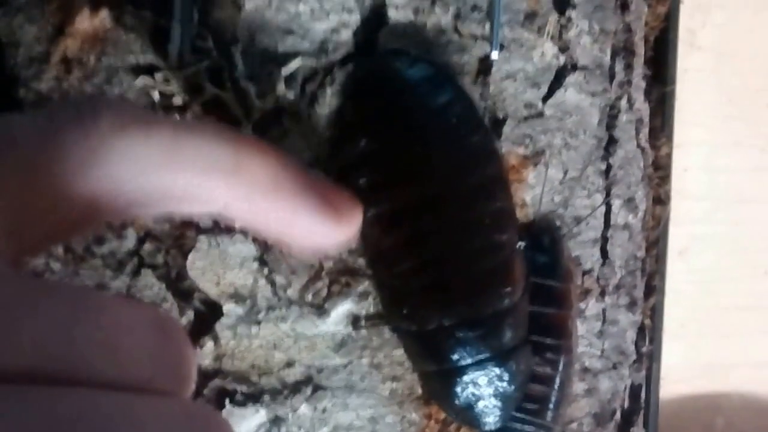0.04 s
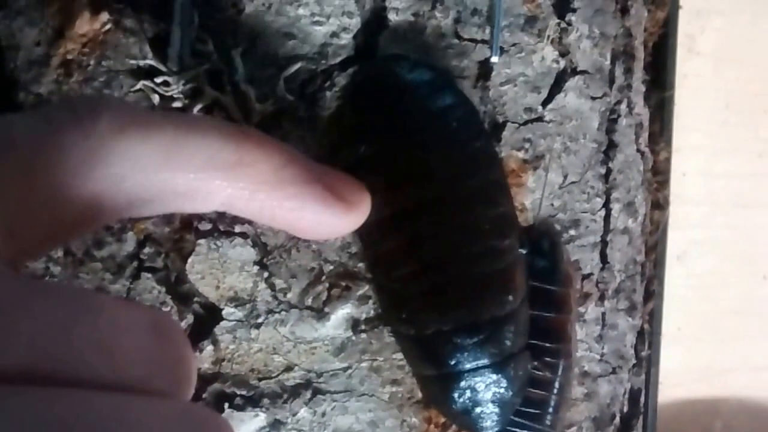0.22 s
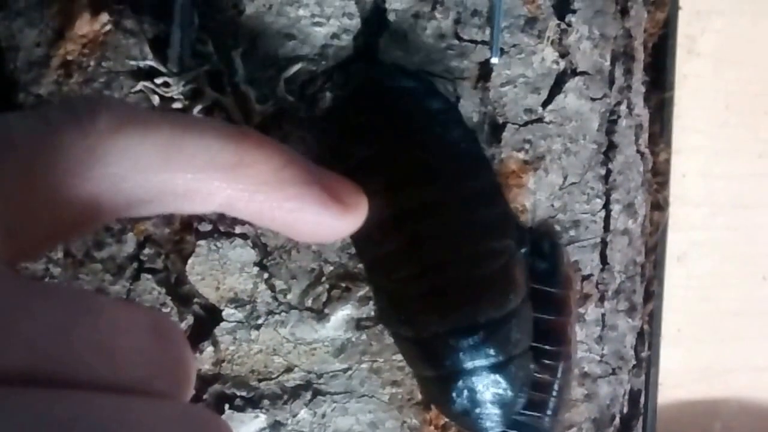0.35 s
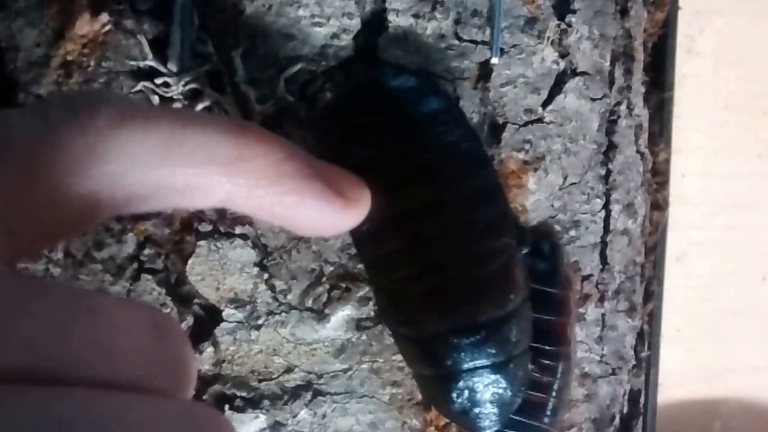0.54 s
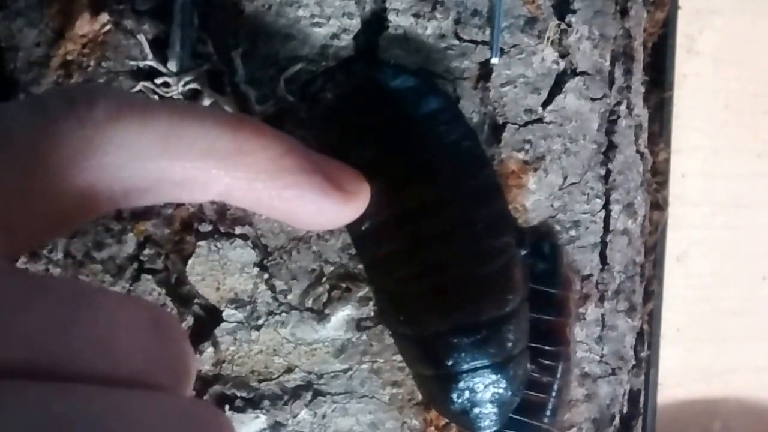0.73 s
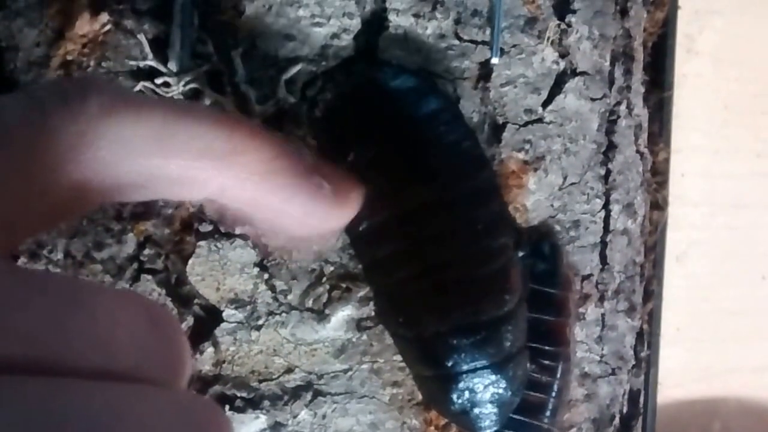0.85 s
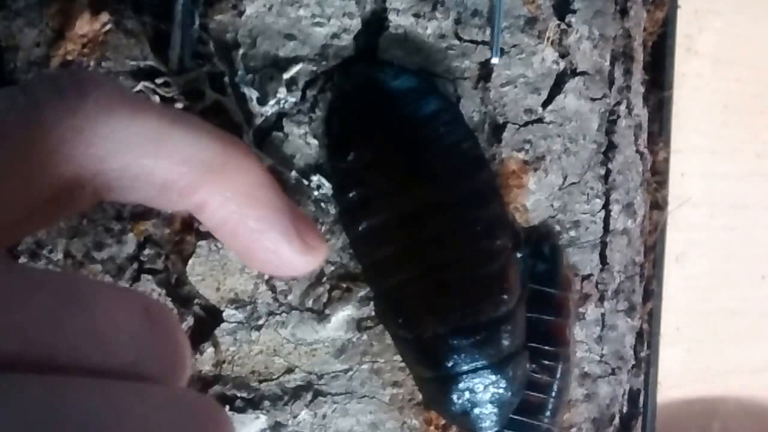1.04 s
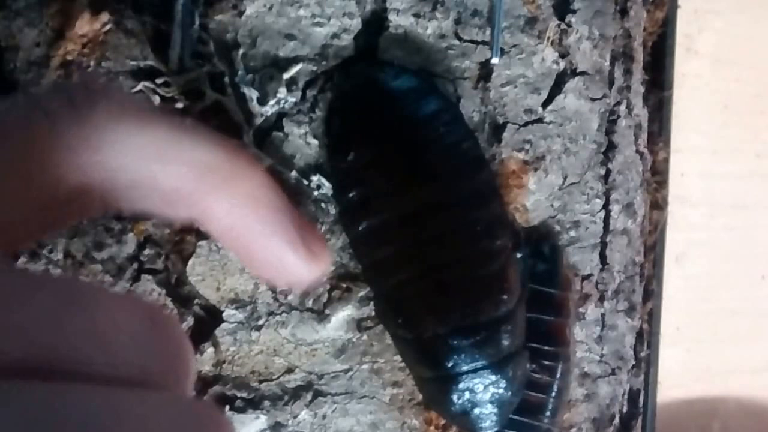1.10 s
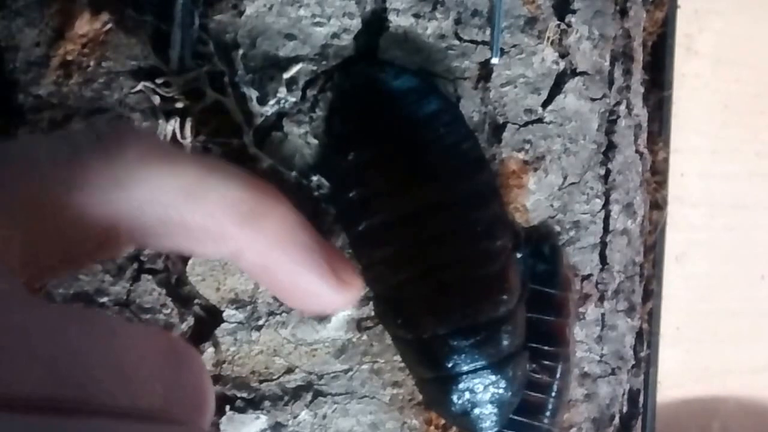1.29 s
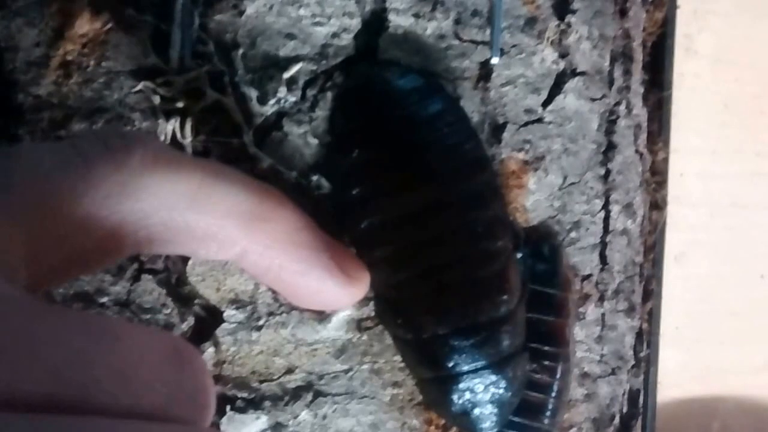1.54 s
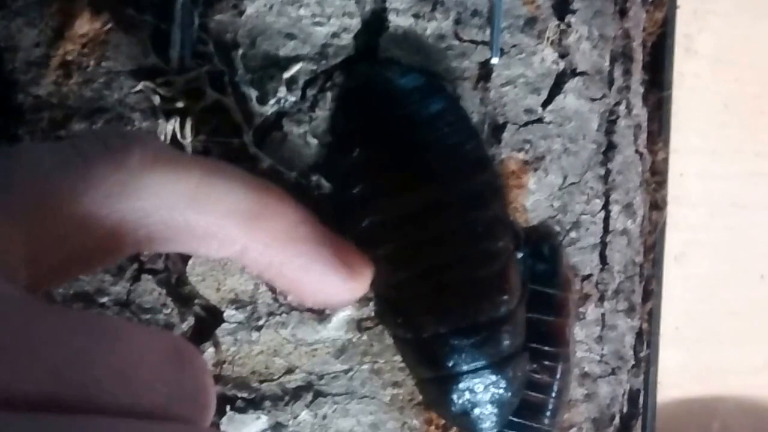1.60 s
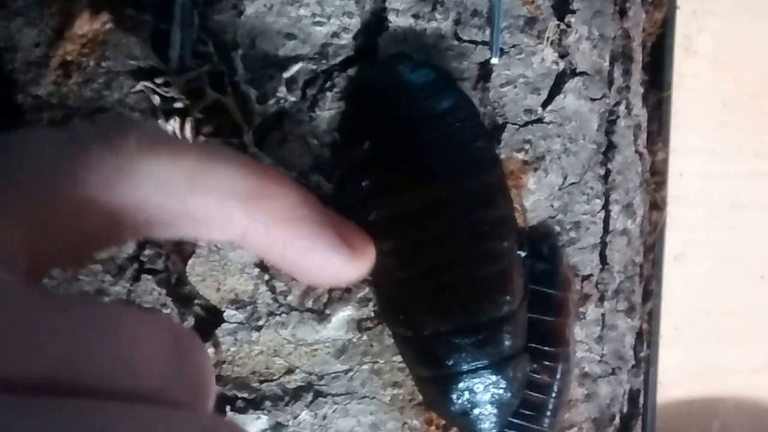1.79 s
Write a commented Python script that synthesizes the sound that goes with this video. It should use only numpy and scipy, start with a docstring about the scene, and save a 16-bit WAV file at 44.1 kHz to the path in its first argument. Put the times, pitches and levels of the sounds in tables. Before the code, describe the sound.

One bright burst of hissing from a big cockroach, about half a second, then quiet room air

```python
"""Hiss of a large cockroach in a tank

A large cockroach in a small indoor tank forces air out through its breathing holes: one long hiss.
It is turbulent noise under a pressure curve, coloured differently on the left and right, with a short echo.
Behind it are soft low thumps (swelling sines with dull noise), a low hum (wavering harmonics),
a faint whirr (narrow-band noise), rumble and quiet room air (stereo noise).
"""
import sys
import numpy as np
from scipy import signal
from scipy.fft import rfft, irfft, next_fast_len
from scipy.io import wavfile
from scipy.ndimage import map_coordinates

SR = 44100
rng = np.random.default_rng(int(sys.argv[2]) if len(sys.argv) > 2 else 0)


def ratio_of_db(decibels):
    """Turn decibels (scalar or array-like) into linear amplitude factors; 0 dB maps to 1."""
    return 10 ** (np.asarray(decibels, float) / 20)


def int16_out(signal):
    """Quantize to a 16-bit WAV file."""
    q = np.round(np.clip(np.atleast_2d(signal).T, -1, 1) * 32767)
    wavfile.write(sys.argv[1], SR, q.astype(np.int16))


N = 81585  # length in samples

# Air pressure driving the hiss. Each row: time in seconds, level in dB before flutter.
PRESSURE = [(.191, -75), (.198, -39), (.225, -33.5), (.3, -30.5), (.42, -26.8), (.56, -26.3), (.65, -27.3),
            (.725, -26.5), (.771, -31), (.781, -42), (.789, -59), (.8, -85)]
# Unsteadiness of the flow. Each row: rate in knots per second, depth in dB.
FLUTTER = [(12, .4), (40, .4), (150, .7)]
# Stereo colour of the hiss. Each row: frequency in Hz, left and right relative levels in dB,
# phase lead of the left in radians, likeness of the sides from 0 to 1.
HISS_SPECTRUM = [(1080, -38, -39, 0.0, 0.97), (1210, -26, -25, -0.1, 0.97), (1290, -26, -24, -0.1, 0.97),
                 (1550, -34, -26, 1.2, 0.37), (1810, -23, -13, -2.8, 0.64), (1980, -22, -22, -3.1, 0.97),
                 (2410, -17, -17, -3.1, 0.97), (2760, -23, -23, -3.1, 0.91), (2800, -20, -20, -3.2, 0.96),
                 (3060, -17, -18, -3.1, 0.97), (3230, -16, -19, -3.3, 0.67), (3620, -10, -10, 0.1, 0.92),
                 (4050, -14, -6, 0.7, 0.34), (4260, -17, -9, -3.2, 0.32), (4570, -13, -3, -2.2, 0.77),
                 (4910, -12, 0, -2.4, 0.87), (5080, -16, -7, -4.1, 0.28), (5340, -8, -3, -5.3, 0.8),
                 (5730, -5, -10, -4.8, 0.6), (5860, -13, -18, -6.9, 0.14), (6460, -18, -20, -4.5, 0.16),
                 (6590, -10, -16, -5.9, 0.7), (6680, -8, -15, -5.8, 0.68), (7490, -6, -12, -9.5, 0.85),
                 (7620, -4, -9, -9.4, 0.9), (7800, -6, -11, -8.1, 0.72), (8910, -4, -8, -11.8, 0.88),
                 (9040, -7, -10, -12.0, 0.87), (9170, -11, -9, -11.3, 0.66), (9300, -9, -17, -10.2, 0.47),
                 (9430, -7, -17, -10.6, 0.51), (9910, -13, -14, -17.8, 0.46),
                 (10030, -10, -16, -15.6, 0.63), (10210, -9, -19, -15.9, 0.61),
                 (10900, -14, -16, -16.9, 0.62), (11070, -19, -15, -20.0, 0.44),
                 (11670, -11, -13, -19.4, 0.87), (11710, -11, -14, -19.4, 0.84),
                 (11890, -18, -20, -18.8, 0.83), (12020, -18, -19, -18.8, 0.92),
                 (12700, -20, -20, -15.7, 0.91), (12960, -25, -27, -15.8, 0.51),
                 (13220, -24, -24, -15.6, 0.91), (14040, -20, -31, -13.8, 0.15),
                 (14250, -26, -32, -13.7, 0.17), (14430, -22, -22, -12.6, 0.87),
                 (14600, -21, -21, -12.6, 0.97), (15120, -21, -22, -15.0, 0.43),
                 (15330, -27, -25, -13.1, 0.43), (15370, -32, -30, -12.9, 0.57)]
# Soft low shoves. Each row: start in seconds, length in seconds, sine peak in dB before panning, pitch in Hz.
THUMPS = [(.02, .17, -45, 33), (.51, .11, -39.5, 38), (1.0, .1, -51, 36)]
# Harmonics of the hum. Each row: multiple of the pitch, rms in dB before waver and panning, waver in dB.
HUM_HARMONICS = [(1, -56.5, 2), (3, -56, 1.2), (4, -70, 3), (6, -78, 3)]
# Swell of the third harmonic. Each row: time in seconds, level in dB (only its departure from the mean acts).
HUM_SWELL = [(0.0, -69), (0.092, -56), (0.252, -61), (1.272, -51), (1.442, -54), (1.484, -60), (1.52, -57),
             (1.782, -57), (1.85, -62)]
# Band of the whirr. Its one row: centre in Hz, half-width to 1/e in Hz, rms in dB.
WHIRR = (1245, 35, -72.5)
# Stereo colour of the low rumble. Each row: frequency in Hz, left and right relative levels in dB,
# phase lead of the left in radians, likeness of the sides from 0 to 1.
RUMBLE_SPECTRUM = [(12, -6, -8, 0, .4), (30, -4, -6, 1, .3), (62, 0, -2, 3, .4), (90, -8, -8, 0, .3),
                   (140, -6, -8, .5, .4), (220, -9, -9, 3, .4), (320, -6, -4, 1.5, .4),
                   (420, -16, -15, 2, .3), (520, -40, -40, 2, .3)]
# Stereo colour of the room air. Each row: frequency in Hz, left and right relative levels in dB,
# phase lead of the left in radians, likeness of the sides from 0 to 1.
AIR_SPECTRUM = [(390, -0.5, 0.0, 2.8, 0.19), (650, -6.7, -5.4, 4.4, 0.12), (1080, -11.6, -10.9, 6.1, 0.79),
                (1120, -10.3, -9.1, 6.2, 0.88), (1160, -8.8, -7.4, 6.2, 0.93),
                (1380, -11.6, -10.5, 6.2, 0.8), (2670, -13.4, -12.8, 3.2, 0.74),
                (2970, -14.1, -12.6, 3.8, 0.27), (4220, -14.6, -11.8, 7.9, 0.21),
                (5040, -15.7, -14.1, 10.2, 0.51), (5770, -17.0, -16.7, 7.3, 0.08),
                (6590, -16.6, -17.8, 6.8, 0.37), (13350, -19.3, -19.0, -10.2, 0.19),
                (15370, -19.1, -19.3, -16.2, 0.32)]

TILT_DB, TILT_HZ, TILT_RATE = 2.2, 6200, 15  # random trade of treble and bass: depth, crossover, knots/s
DULLING, FULL_DB = .5, -29  # treble dB lost for each dB of pressure under full flow
ECHO_DB, ECHO_T60 = -17, .035  # short echo: level in dB, time to fall 60 dB in seconds
RUSTLE_DB, RUSTLE_HZ = -18, 750  # noise riding on a thump: rms in dB re the sine peak, upper edge
HUM_HZ, HUM_PAN_DB, HUM_LEAD = 43.07, 1.5, .45  # pitch, dB up on the left and down on the right, left lead in rad
RUMBLE_DB, AIR_DB = -59, -57  # rms levels


def unit(x):
    """Normalisation: scale to an rms of 1."""
    return x / np.sqrt(np.mean(x ** 2) + 1e-20)


def curve(rows):
    """Linear interpolation of (seconds, value) rows, one value a sample."""
    return np.interp(np.arange(N) / SR, *np.transpose(rows))


def wobble(rate):
    """Random modulation: a smooth curve through Gaussian knots, rate of them a second."""
    return map_coordinates(rng.standard_normal(1000), [np.arange(N) * rate / SR])


def filtered(x, response):
    """Linear filtering: the spectrum of x times a response of frequency."""
    size = next_fast_len(N + 8192)
    gain = response(np.fft.rfftfreq(size, 1 / SR))
    return irfft(rfft(x, size) * gain, size)[..., :N]


def stereo_noise(rows):
    """Partial coherence: a shared noise with a phase lead plus independent noise on each side, rms 1."""
    def response(hz):
        """Power split: gains of the shared noise on both sides, then of each side's own noise."""
        f, *cols = np.transpose(rows)
        left_db, right_db, lead, alike = (np.interp(np.log(hz + 1), np.log(f + 1), c) for c in cols)
        alike = np.clip(alike, 0, 1)
        inside = (hz > .9 * f[0]) & (hz < 1.02 * f[-1])
        gain = ratio_of_db([left_db, right_db]) * inside
        turn = np.exp(.5j * np.array([lead, -lead]))
        return np.concatenate([gain * turn * np.sqrt(alike), gain * np.sqrt(1 - alike)])

    shared, left, right = rng.standard_normal((3, N))
    parts = filtered(np.array([shared, shared, left, right]), response)
    return unit(parts[:2] + parts[2:])


def short_echo(sound):
    """Reverberation: convolution with exponentially decaying noise of unit energy."""
    t = np.arange(SR // 5) / SR
    tail = rng.standard_normal(len(t)) * ratio_of_db(-60 * t / ECHO_T60)
    tail = tail / np.linalg.norm(tail)
    return ratio_of_db(ECHO_DB) * signal.fftconvolve(sound, tail[None], axes=1)[:, :N]


def hiss():
    """Jet turbulence: pressure sets the level of broadband noise, and weaker flow has less treble."""
    jet = stereo_noise(HISS_SPECTRUM)
    low = filtered(jet, lambda hz: 1 / (1 + (hz / TILT_HZ) ** 8))
    high = jet - low
    pressure_db = curve(PRESSURE)
    tilt_db = TILT_DB * wobble(TILT_RATE)
    dull_db = DULLING * np.clip(pressure_db - FULL_DB, -30, 0)
    flow_db = pressure_db + sum(depth_db * wobble(rate) for rate, depth_db in FLUTTER)
    direct = ratio_of_db(flow_db) * (low * ratio_of_db(-tilt_db / 2) + high * ratio_of_db(tilt_db / 2 + dull_db))
    return direct + short_echo(direct)


def thumps():
    """Amplitude modulation: one swell shapes a few cycles of a low sine and a dull rustle."""
    noise = rng.standard_normal((2, N))
    rustle = unit(filtered(noise, lambda hz: 1 / (1 + hz / 80) / (1 + (hz / RUSTLE_HZ) ** 4)))
    out = np.zeros((2, N))
    for start, length, peak_db, hz in THUMPS:
        t = np.clip(np.arange(N) / SR - start, 0, length)
        swell = np.abs(np.sin(np.pi * (t / length) ** .65))  # rises faster than it falls
        shove = -np.sin(2 * np.pi * hz * t)
        out += ratio_of_db(peak_db) * swell * (shove + ratio_of_db(RUSTLE_DB) * rustle)
    return out * ratio_of_db([[1.2], [-1.2]])  # louder on the left


def hum():
    """Harmonic series: multiples of one low pitch, each wavering; the third also swells."""
    t = np.arange(N) / SR
    side = np.array([[1], [-1]])  # left, right
    swell_db = curve(HUM_SWELL)
    swell_db = swell_db - swell_db.mean()
    out = np.zeros((2, N))
    for multiple, rms_db, waver_db in HUM_HARMONICS:
        level_db = rms_db + waver_db * wobble(9)
        if multiple == 3:
            level_db = level_db + swell_db
        phase = 2 * np.pi * (multiple * HUM_HZ * t + rng.random()) + side * HUM_LEAD / 2
        out += ratio_of_db(level_db + side * HUM_PAN_DB) * np.sqrt(2) * np.sin(phase)
    return out


def whirr():
    """Narrow-band noise: white noise through a Gaussian passband, alike on both sides."""
    centre, width, rms_db = WHIRR
    band = filtered(rng.standard_normal(N), lambda hz: np.exp(-((hz - centre) / width) ** 2))
    return ratio_of_db(rms_db) * unit(band)


def rumble():
    """Low-frequency noise, partly coherent between left and right."""
    return ratio_of_db(RUMBLE_DB) * stereo_noise(RUMBLE_SPECTRUM)


def room_air():
    """Steady broadband noise whose coherence between left and right varies with frequency."""
    return ratio_of_db(AIR_DB) * stereo_noise(AIR_SPECTRUM)


def scene():
    """Superposition: the pressures of all sources add."""
    return hiss() + thumps() + hum() + whirr() + rumble() + room_air()


def low_pass(x):
    """Removes everything above the highest recorded frequency."""
    return signal.sosfilt(signal.butter(12, 16060, fs=SR, output="sos"), x)


def record(dry):
    """Band limitation: nothing passes from 15500 Hz up."""
    mix = filtered(dry, lambda hz: hz < 15500)
    return low_pass(mix)


dry = scene()
out = record(dry)
int16_out(out)
```